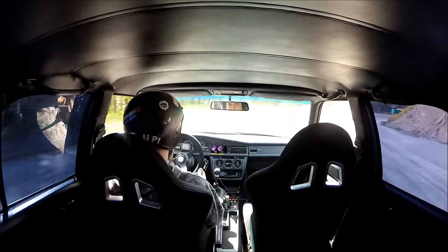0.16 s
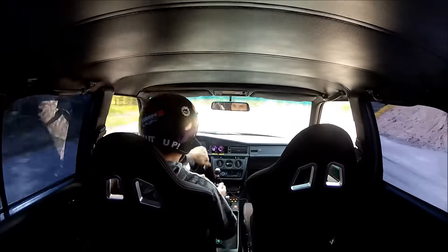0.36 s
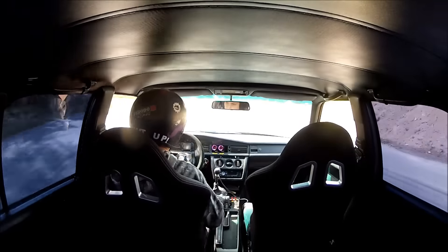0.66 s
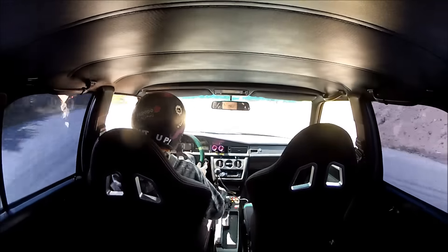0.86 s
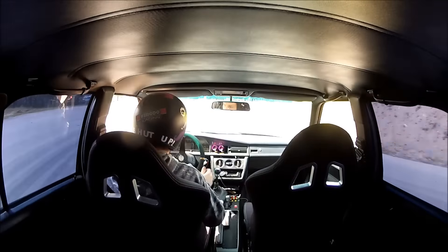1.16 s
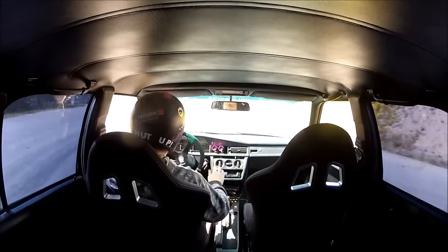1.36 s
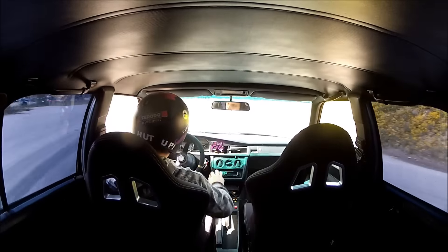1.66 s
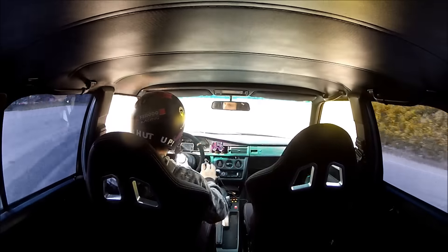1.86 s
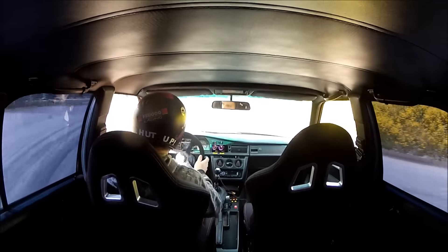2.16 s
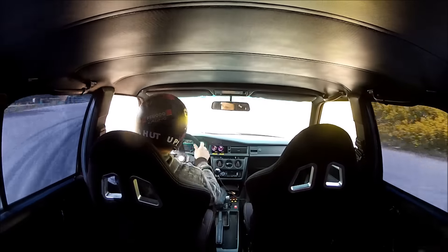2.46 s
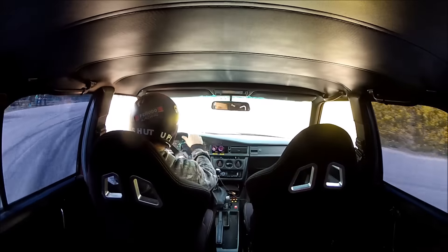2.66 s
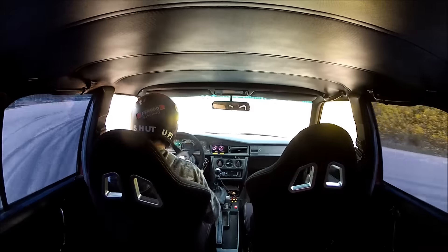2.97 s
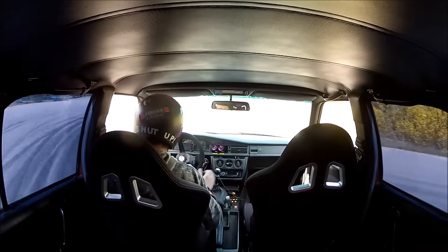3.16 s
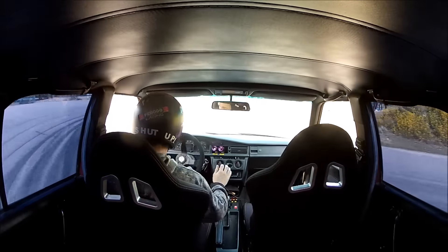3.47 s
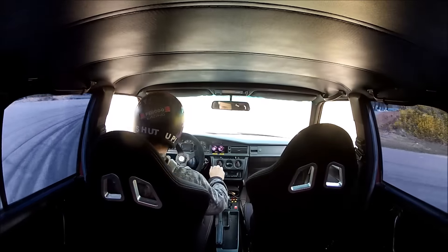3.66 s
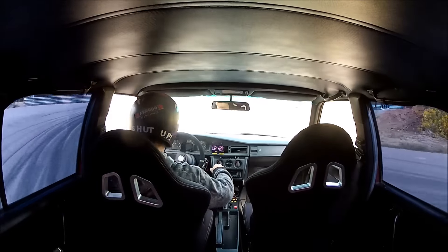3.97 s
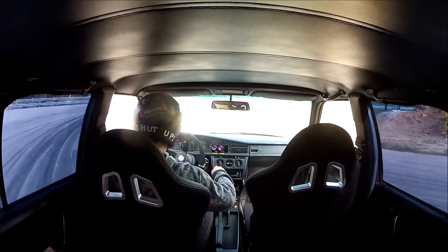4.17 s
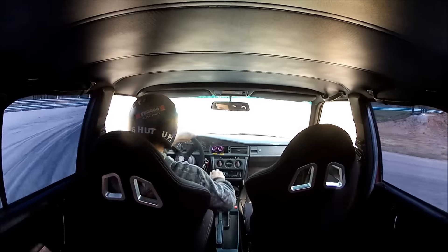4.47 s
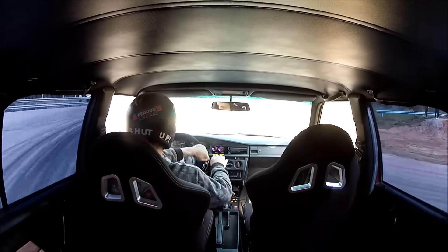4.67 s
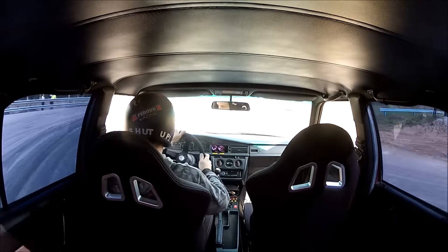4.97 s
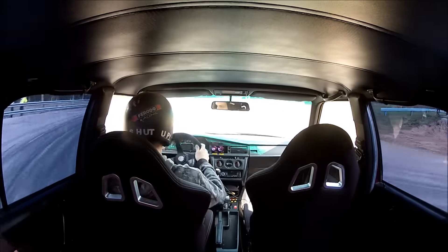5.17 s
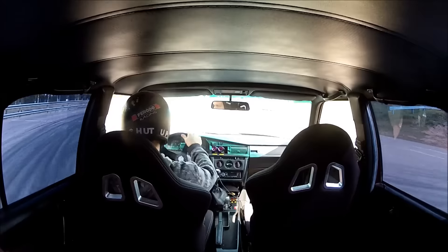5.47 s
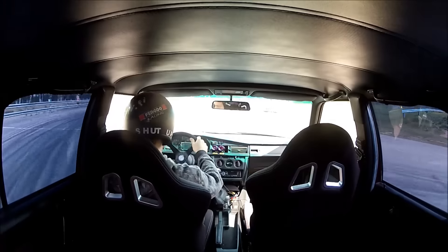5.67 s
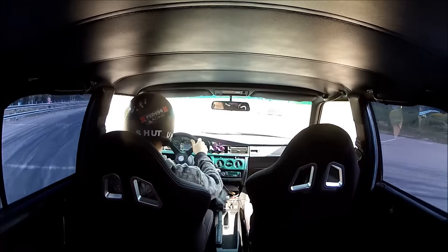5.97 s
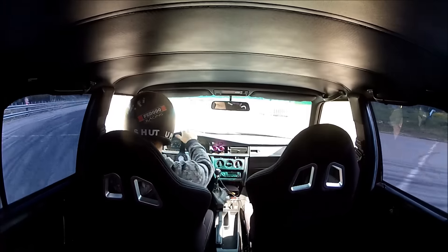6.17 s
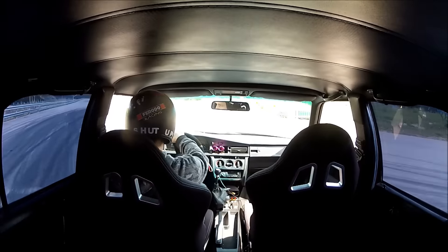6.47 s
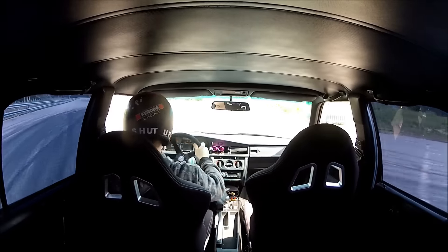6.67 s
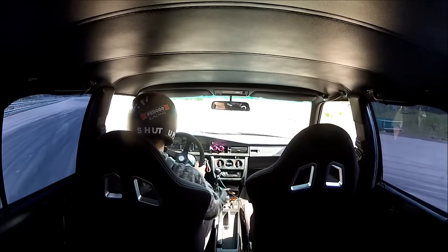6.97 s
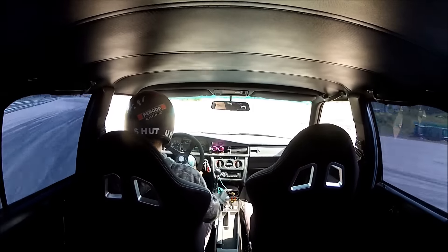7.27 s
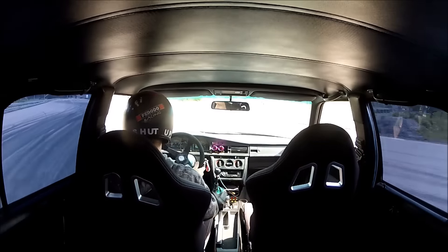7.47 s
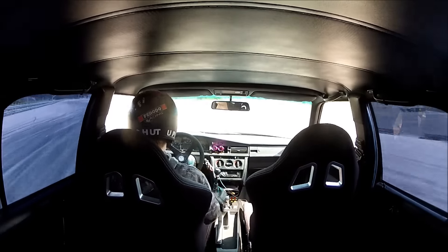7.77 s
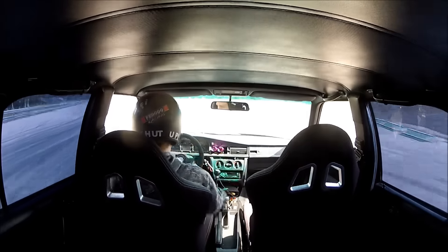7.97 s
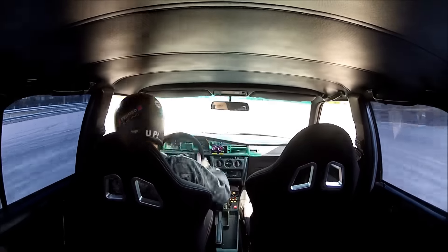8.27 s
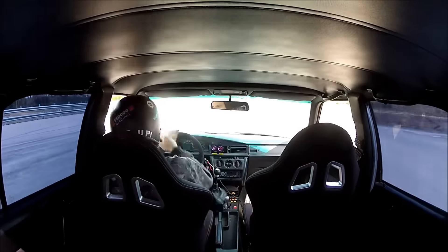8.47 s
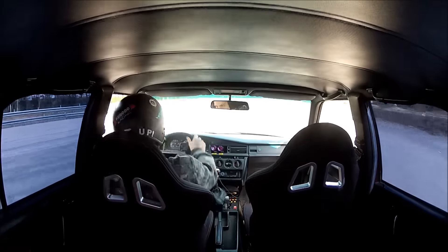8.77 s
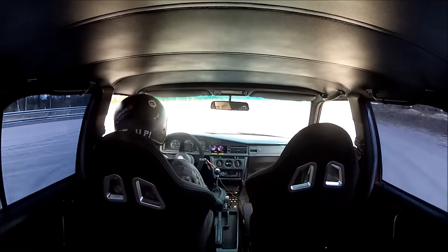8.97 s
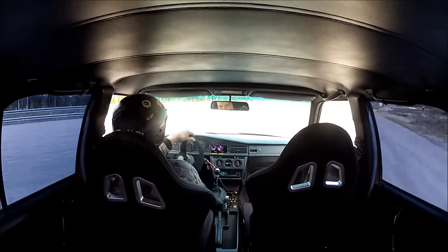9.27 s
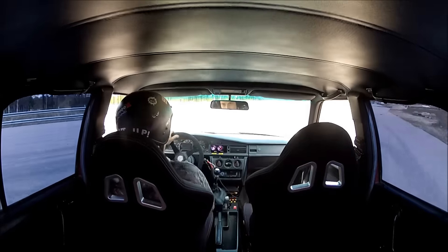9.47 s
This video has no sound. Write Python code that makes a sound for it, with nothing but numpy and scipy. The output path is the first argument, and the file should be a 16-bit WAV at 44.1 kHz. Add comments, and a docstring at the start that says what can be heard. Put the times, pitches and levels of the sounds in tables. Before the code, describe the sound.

Inside a drifting car, a diesel engine revs up and down over tyre squeal, road rumble and heavy wind buffeting.

```python
"""A six-cylinder turbo diesel revs hard, heard from inside a drifting car with its side windows open.
Firing pulses drone through the exhaust and knock in the block as the revs swing and sit at the governor.
The rear tyres stick and slip on the asphalt, squealing and roaring through each slide.
Wind across the windows makes the cabin boom over the road rumble. A limiter ducks the biggest booms,
their peaks are rounded off, and a thin fizz rides on top."""
import sys
import numpy as np
from scipy import signal
from scipy.fft import rfft, irfft, next_fast_len
from scipy.io import wavfile
from scipy.ndimage import uniform_filter1d, minimum_filter1d

SR = 44100
rng = np.random.default_rng(int(sys.argv[2]) if len(sys.argv) > 2 else 0)


def master_out(mix):
    """Clip the mix to full scale and print it as 16-bit PCM to the path in sys.argv[1]."""
    frames = np.transpose(np.atleast_2d(mix))
    ceiling = np.clip(frames, -1, 1)
    pcm = np.round(ceiling * 32767).astype(np.int16)
    wavfile.write(sys.argv[1], SR, pcm)


N = 424241
TIME = np.arange(N) / SR

# Ticks of loose trim. Each row: start in seconds, relative level in dB.
TRIM_TICKS = [(0.547, -44), (0.57, -40), (0.63, -39.5)]
# Level rides for road rumble, wind buffeting and exhaust drone. Each row: time in seconds, level in dB.
ROAD_LEVEL = [(0,-30.5),(.5,-26),(1.05,-32),(1.4,-28.5),(1.9,-25),(2.3,-25.5),(2.7,-34),(3.1,-29.5),(3.9,-29),(4.6,-24),(7.2,-27.5),(8.25,-25),(8.55,-27),(9.2,-22.5),(9.62,-27.5)]
BUFFET_LEVEL = [(0,-32.5),(.3,-22.5),(1.2,-18),(2,-25),(3.5,-22),(3.8,-20),(4.1,-28),(4.5,-21),(5.3,-20),(6.9,-15.5),(7.4,-19.5),(8.85,-19),(9.08,-16),(9.62,-23.5)]
DRONE_LEVEL = [(0,-21.5),(.48,-34.5),(.7,-25),(1.08,-40.5),(1.26,-26),(1.58,-25.5),(1.84,-38),(2.14,-25.5),(2.65,-35),(3.5,-29),(3.72,-27.5),(4.12,-24.5),(4.3,-32.5),(5.1,-31.5),(6.86,-33.5),(7.55,-24),(8.58,-28.5),(8.92,-20.5),(9.33,-27),(9.62,-34.5)]
# Gusts and lulls across the windows. Each row: middle in seconds, length in seconds, boom drive in dB.
GUSTS_AND_LULLS = [(0.513,.14,-10),(0.752,.24,-9),(0.992,0.093,-20.5),(1.074,0.034,-4.5),(1.237,0.099,-9),(1.444,0.1,-4),(1.703,.17,-7),(1.833,.09,-5),(2,0.15,-9.5),(2.264,0.15,-4),(2.433,0.12,-1.5),(2.553,0.17,-9.5),(2.785,.16,-9),(3.092,0.09,-7),(3.259,0.18,-7.5),(3.772,0.084,-10),(3.906,.07,-4),(4.03,.09,-33),(4.385,0.072,-5.5),(4.671,0.34,-5.5),(5.349,0.23,-9.5),(5.993,0.091,-10.5),(6.59,0.069,-3.5),(7.272,0.23,-21),(7.925,0.047,-7.5),(8.105,0.15,-6.5),(8.242,.09,0.5),(8.35,0.15,-9),(8.581,0.097,-21),(9.241,0.07,-3),(9.374,0.033,-6)]

# Tone colours. Each row: frequency in Hz, gain in dB.
ROAD_EQ = [(10,-12.5),(28,2),(45,2.5),(130,-6.5),(180,-9),(300,-12.5),(420,-17.5),(600,-30.5),(1200,-70)]
BUFFET_EQ = [(50,-65.5),(76,-15),(92,2.5),(104,-0.5),(120,-11.5),(140,-19),(250,-68.5)]
HISS_EQ = [(1800,-22.5),(2150,9),(2400,7.5),(2520,2),(2850,5),(3400,-5.5),(3700,2),(4000,-12),(4800,-22),(5500,-13.5),(6000,-34),(6600,-14),(7600,-30.5),(11000,-41.5)]
CABIN_EQ = [(300,-21),(480,-14),(600,-15),(720,0.5),(950,-5.5),(1140,6),(1280,-3.5),(1500,2),(1800,-12),(2100,3),(2360,-7),(2540,-16.5),(2900,-11.5),(3700,-26.5)]  # what gets in from engine and tyres
TREBLE_EQ = [(3700,-0.5),(4300,-11),(5500,-7),(6000,-28.5),(6600,-17),(8000,-21),(15000,-28)]  # dulled treble with a notch at 6 kHz
PIPE_EQ = [(260,-34.5),(390,-31.5),(470,-39),(555,-40),(600,-38),(670,-32),(725,-24.5),(775,-36),(830,-29),(860,-27.5),(930,-20.5),(1050,-29.5),(1112,-20.5),(1140,-24.5),(1180,-19.5)]  # resonances of exhaust pipe and cabin

# The rear tyres break loose. Each row: start and end in seconds, level in dB,
# first and last stick-slip rate in Hz.
SLIDES = [(0.599,0.781,-37,908,949.4),(.8,1.202,-29.5,955.4,977.5),(1.199,1.55,-30.5,985,1086),(1.684,2.2,-30,1059,1090),(2.56,3.03,-26,1109,1043),(3.03,3.541,-29.5,1072,1048),(3.535,3.902,-26.5,1010,1032),(3.9,4.11,-26,1045,1149),(8.75,9.33,-38.5,1076,1113),(9.46,9.695,-28.5,1073,978.5)]
# The two rear tyres. Each row: multiple of the stick-slip rate, relative level in dB.
REAR_TYRES = [(.98, 0.5), (1.055, -3)]
# The squeal's harmonics from the first up, each a relative level in dB.
SQUEAL_DB = (0.5, -3.5, -14, -34.5)
# One-off accents. Each holds: start and end in seconds, level in dB, centre frequency in Hz.
TYRE_NOTE = (-.05, .15, -27.5, 1100)
WHISTLE = (9.26, 9.335, -40.5, 3640)
BLOW_OFF = (2.17, 2.53, -34, 1450)

# Engine speed. Each row: time in seconds, firing rate in Hz.
FIRING_RATE = [(0,239),(.16,266.2),(.31,283),(.5,203.2),(.7,187),(1.1,163),(1.28,201.7),(1.55,243.3),(1.82,226.5),(2.13,243.6),(2.6,159.4),(2.81,132.5),(2.95,124.9),(3.19,139.7),(3.54,140.1),(3.7,172),(4.22,262.8),(4.39,282),(4.62,295.9),(4.79,286.8),(5.01,267),(5.25,278.7),(6.83,277.6),(7.13,263.1),(7.58,260.8),(7.9,266.7),(8.41,277.2),(8.6,207.1),(9.14,274.4),(9.31,285.2),(9.62,192)]
# Footwork. Each row: start and end in seconds, travel from part throttle (negative is lifted).
PEDAL_MOVES = [(0.065,0.232,-0.47),(0.245,0.328,0.24),(.33,1.177,-1.7),(1.203,1.404,-0.01),(1.427,1.556,0.43),(1.593,2.2,-0.41),(2.53,2.996,-0.5),(3.991,4.09,0.4),(4.393,4.488,0.42),(4.524,4.82,-0.26),(4.851,4.908,0.78),(4.956,5.19,0.44),(5.182,6.86,0.92),(6.862,7.212,0.76),(7.2,8.194,0.38),(8.36,8.442,0.47),(8.486,8.632,-0.89),(8.802,8.932,0.35),(9.067,9.222,0.25),(9.219,9.344,0.84),(9.376,9.62,-0.38)]
# The governor cuts fuel and the firing roughens: start and end in seconds, extra unevenness in dB.
AT_GOVERNOR = (5.19, 6.86, 2.5)
# How layers follow the engine. Each holds: gain in dB at governor speed and part throttle,
# dB per unit of pedal, dB per octave of speed.
RASP_LAW = (-47, 14.7, 16)
ROAR_LAW = (-33.5, 4.8, 4.1)
UNEVEN_LAW = (-7, 4.33, 12.4)
BANKS_LAW = (-36, 2, 20)
# Growl of unequal cylinders and hum of rotating parts.
# Each row: multiple of the engine cycle rate, relative level in dB.
GROWL_PARTIALS = [(4, -44.8), (5, -36.9), (14, -46.1), (15, -43.1), (16, -44.7), (20, -35.3), (23, -42.2),
                  (25, -45.3), (26, -44.9), (27, -45.0), (30, -41.6), (32, -38.9), (33, -42.9), (35, -42.6),
                  (36, -36.2), (41, -44.2), (42, -41.1), (44, -40.2), (45, -39.1), (46, -40.3), (47, -40.2),
                  (48, -43.5), (49, -41.5), (51, -42.0)]
SHAFT_PARTIALS = [(2,-18),(2.56,-31),(3.41,-34),(5,-43)]
# Weak orders from the manifold's two banks. Each row: multiple of the firing rate, relative level in dB.
BANK_ORDERS = [(1.5, -13), (2.5, -12), (3.5, -10), (4.5, -12), (5.5, -12), (6, -10)]
# Exhaust harmonics 2 to 4. Each row: level ahead of the pipe in dB, dB per unit of pedal.
EXHAUST_HARMONICS = [(-4, 9), (-10.5, 10.5), (-13.5, 11.5)]

GOVERNOR_HZ, PEDAL_LAG_S = 278, .081  # the lag is how long the engine takes to follow the foot
GRIP_S, GUST_EDGE_S = .15, .037  # fade times of a squeal and of a gust


def amp(db):
    """Decibels to gain."""
    return 10 ** (np.asarray(db) / 20)


def unit(x):
    """Scale to rms 1."""
    return x / np.sqrt(np.mean(x ** 2) + 1e-20)


def colour(points, hz):
    """Gain of an EQ curve, drawn on a log frequency axis."""
    corners_hz, db = np.transpose(points)
    return amp(np.interp(np.log(hz + 1), np.log(corners_hz), db))


def curve(rows):
    """Straight ramps through rows of time and value."""
    return np.interp(TIME, *np.transpose(rows))


def gate(start, end, edge_s):
    """1 from start to end, with smooth fades centred on both."""
    inside_s = np.minimum(TIME - start, end - TIME)
    return np.sin(np.pi / 2 * np.clip(inside_s / edge_s + .5, 0, 1)) ** 2


def wobble(rate):
    """A smooth random curve of rms 1, rate knots a second."""
    knots = rng.standard_normal(int(N * rate / SR) + 4)
    fine = signal.resample_poly(knots, 8, 1)
    return unit(np.interp(TIME * rate * 8, np.arange(len(fine)), fine))


def filtered(x, response):
    """Shape x with a gain that depends on frequency."""
    size = next_fast_len(N + SR // 2)
    return irfft(rfft(x, size) * response(np.fft.rfftfreq(size, 1 / SR)), size)[:N]


def noise(response):
    """Coloured noise of rms 1."""
    return unit(filtered(rng.standard_normal(N), response))


def band(hz, centre_hz, half_width_hz, order):
    """A band-pass bell; a higher order has steeper skirts."""
    return 1 / (1 + ((hz - centre_hz) / half_width_hz) ** order)


def tone(turns, flutter_db):
    """A sine that follows a phase in turns and flutters in level."""
    return np.sqrt(2) * np.sin(2 * np.pi * (turns + rng.random())) * amp(flutter_db * wobble(25))


def cabin(hz):
    """Engine and tyres as they sound in the cabin: thin in the bass, dull in the treble."""
    return colour(CABIN_EQ, hz) * colour(TREBLE_EQ, hz) * hz ** 2 / (hz ** 2 + 250 ** 2)


def bright(hz):
    """The colour of tyre hiss and engine rasp."""
    return colour(HISS_EQ, hz)


def trim_ticks():
    """Loose trim ticks as the body twists."""
    decays = sum((TIME >= start) * amp(db - 60 * np.abs(TIME - start) / .065) for start, db in TRIM_TICKS)
    return amp(-8) * decays * noise(lambda hz: band(hz, 5200, 2200, 4))


def road_rumble():
    """The road lays a low, gently heaving bed under the car."""
    return amp(curve(ROAD_LEVEL) + 1.46 * wobble(5)) * noise(lambda hz: colour(ROAD_EQ, hz))


def window_wind():
    """Air across the open windows drives the lowest cabin resonance, with buffeting around it."""
    ring = noise(lambda hz: band(hz, 66, 8, 2) ** 1.5)
    swell = np.abs(signal.hilbert(ring))
    straight_db = -8 * gate(-1, .49, GUST_EDGE_S)  # weaker until the car swings sideways
    airflow = amp(-14 + 2 * wobble(16) + straight_db)  # the breeze between gusts
    for middle, length, db in GUSTS_AND_LULLS:
        airflow += (amp(db) - airflow) * gate(middle - length / 2, middle + length / 2, GUST_EDGE_S)
    # the resonance saturates: its pitch wanders while its strength follows the airflow
    saturated = unit(ring / (swell + .33))
    boom = filtered(airflow * saturated, lambda hz: band(hz, 67, 19, 6))
    buffet = amp(curve(BUFFET_LEVEL)) * noise(lambda hz: colour(BUFFET_EQ, hz))
    return boom + buffet


def tyre_note():
    """A tyre near the limit of grip sings on one wavering note."""
    start, end, db, pitch_hz = TYRE_NOTE
    turns = np.cumsum(pitch_hz * (1 + .021 * wobble(116))) / SR
    return amp(db) * gate(start, end, GRIP_S) * tone(turns, flutter_db=.5)


def tyre_slides():
    """Both rear tyres stick and slip at an unsteady, gliding rate; the rubber scrubs and hisses."""
    slip_hz = curve([point for start, end, _, first_hz, last_hz in SLIDES
                     for point in ((start, first_hz), (end, last_hz))])
    sliding = sum(amp(db) * gate(start, end, GRIP_S) for start, end, db, _, _ in SLIDES)
    squeal = np.zeros(N)
    for detune, tyre_db in REAR_TYRES:
        waver = 1 + .013 * wobble(28) + .016 * wobble(420)
        turns = np.cumsum(slip_hz * detune * waver) / SR
        voice = sum(amp(db) * np.sin(2 * np.pi * k * turns + .5 * wobble(150))
                    for k, db in enumerate(SQUEAL_DB, 1))
        squeal += voice * amp(tyre_db + 2.95 * wobble(70))
    # tread blocks that fail to lock to the squeal scrub around it
    scrub = noise(lambda hz: cabin(hz) * band(hz, 1030, 240, 4))
    hiss = amp(-9.5) * noise(cabin) + amp(-14) * noise(bright)
    return sliding * (amp(-.4) * unit(squeal) + amp(-3) * scrub + hiss)


def brief_whistle():
    """A short, high whistle rings at the last rev peak."""
    start, end, db, pitch_hz = WHISTLE
    turns = np.cumsum(pitch_hz * (1 + .0067 * wobble(100))) / SR
    return amp(db) * gate(start, end, .033) * tone(turns, flutter_db=9)


def blow_off():
    """The turbo lets go one rush of air."""
    start, end, db, centre_hz = BLOW_OFF
    rush = noise(lambda hz: band(hz, centre_hz, 700, 2) * colour(TREBLE_EQ, hz)
                 * hz ** 2 / (hz ** 2 + 600 ** 2))
    return amp(db) * gate(start, end, .053) * rush


def engine_cycle():
    """Running count of two-turn cycles, six firings each; the crank speed wavers a little."""
    return np.cumsum(curve(FIRING_RATE) * (1 + .0023 * wobble(30))) / SR / 6


def pedal():
    """Throttle as the engine feels it, 0 at part throttle."""
    return sum(travel * gate(start, end, PEDAL_LAG_S) for start, end, travel in PEDAL_MOVES)


def driven(law, throttle):
    """Gain of a layer that grows with throttle and engine speed."""
    db, pedal_db, octave_db = law
    return amp(db + pedal_db * throttle + octave_db * np.log2(curve(FIRING_RATE) / GOVERNOR_HZ))


def unevenness(throttle):
    """How unequally the cylinders fire: most at the governor."""
    start, end, db = AT_GOVERNOR
    return driven(UNEVEN_LAW, throttle) * amp(db * gate(start, end, PEDAL_LAG_S))


def knock_share(throttle):
    """Power balance of knock against noise: uneven firing brings the knock forward."""
    return np.clip(.82 * unevenness(throttle) ** 2, 0, .9)


def knocking(cycle, response):
    """Each combustion rings the block; every cylinder has its own place, so its own ring. Rms 1."""
    firings = np.flatnonzero(np.diff(np.floor(6 * cycle)))
    strengths = np.resize([1.6, .3, .9, .8, .2, 1.1], len(firings))  # the six cylinders in turn
    strengths *= 1 + .15 * rng.standard_normal(len(firings))
    decay = amp(-60 * np.arange(SR // 20) / SR / .081)
    rings = np.zeros(N)
    for cylinder in range(6):
        knocks = np.zeros(N)
        knocks[firings[cylinder::6]] = strengths[cylinder::6]
        rings += signal.oaconvolve(knocks, rng.standard_normal(len(decay)) * decay)[:N]
    return unit(filtered(rings, response))


def boost_rasp(cycle, throttle):
    """Under boost, pulsing air hiss and sharp combustion knock make a treble rasp."""
    share = knock_share(throttle)
    pulse = 1 + .5 * np.cos(2 * np.pi * 6 * cycle)
    hiss = np.sqrt(1 - share) * pulse * noise(bright)
    knock = np.sqrt(share) * knocking(cycle, bright)
    return driven(RASP_LAW, throttle) * (hiss + knock)


def engine_block(cycle, throttle):
    """Unequal cylinders growl over diesel clatter, a broad roar and the hum of the shafts."""
    uneven, share = unevenness(throttle), knock_share(throttle)
    partials = sum(amp(db) * tone(k * cycle, flutter_db=2.5) for k, db in GROWL_PARTIALS)
    growl = amp(2.3) * uneven ** 1.44 * unit(partials)
    clatter = amp(-1) * np.sqrt(share) * knocking(cycle, cabin)
    roar = amp(1.72) * np.sqrt(1 - share) * noise(cabin)
    hum = uneven * sum(amp(db) * tone(k * cycle, flutter_db=1) for k, db in SHAFT_PARTIALS)
    return driven(ROAR_LAW, throttle) * (growl + clatter + roar) + hum


def exhaust(cycle, throttle):
    """Firing pulses drone, overtones sweep the pipe's resonances, and the two banks add weak orders."""
    firing, firing_hz = 6 * cycle, curve(FIRING_RATE)
    drone = amp(curve(DRONE_LEVEL)) * tone(firing, flutter_db=2.8)
    start, end, _ = AT_GOVERNOR
    jitter_turns = .049 * (1 - gate(start, end, PEDAL_LAG_S))  # the phase steadies at the governor
    overtones = np.zeros(N)
    for k, (db, pedal_db) in enumerate(EXHAUST_HARMONICS, 2):
        gain = colour(PIPE_EQ, k * firing_hz) * amp(db + pedal_db * throttle)
        overtones += gain * tone(k * firing + jitter_turns * wobble(110), flutter_db=1.54)
    banks = sum(amp(db) * tone(k * firing, flutter_db=3.5) for k, db in BANK_ORDERS)
    return drone + overtones + driven(BANKS_LAW, throttle) * banks


def scene():
    """The mono mix, as heard behind the seats."""
    cycle, throttle = engine_cycle(), pedal()
    engine = exhaust(cycle, throttle) + engine_block(cycle, throttle) + boost_rasp(cycle, throttle)
    accents = brief_whistle() + blow_off()
    tyres = tyre_slides() + tyre_note()
    return (engine + accents + tyres + window_wind() + road_rumble() + trim_ticks())[None]


def record(dry):
    """A limiter ducks the biggest booms, peaks are rounded off, and clock jitter adds a thin fizz."""
    ceiling, hold = 1.17, int(.025 * SR)
    jitter_hz, top_hz = 12000, 15400
    duck = minimum_filter1d(ceiling / np.maximum(np.abs(dry[0]), ceiling), hold)
    limited = dry[0] * uniform_filter1d(duck, hold)
    rounded = limited / (1 + (limited / 1.02) ** 12) ** (1 / 12)
    # periodic jitter of the sample clock mirrors the sound into the treble
    dulled = filtered(rounded, lambda hz: band(hz, 0, 4500, 4))
    slope = np.gradient(dulled) * SR / (2 * np.pi * 1000)  # unity gain at 1 kHz
    mirrored = slope * np.cos(2 * np.pi * jitter_hz * TIME)
    fizz = filtered(mirrored, lambda hz: colour([(8000, -8.5), (11000, -14.5), (15000, -15.5)], hz))
    return filtered(rounded + fizz, lambda hz: hz < top_hz)[None]


dry = scene()
out = record(dry)
master_out(out)
```